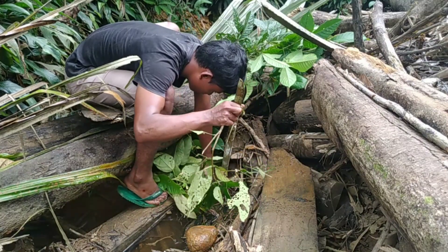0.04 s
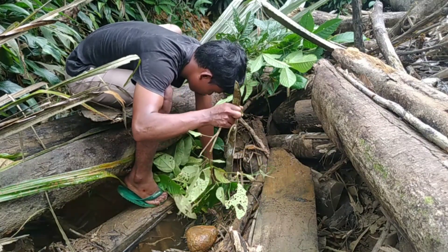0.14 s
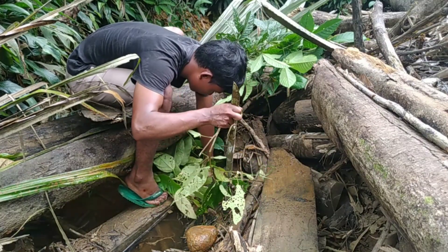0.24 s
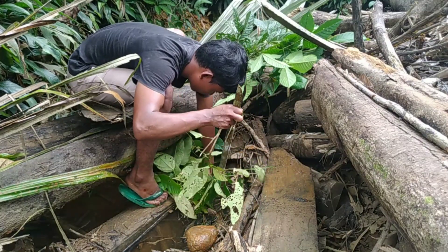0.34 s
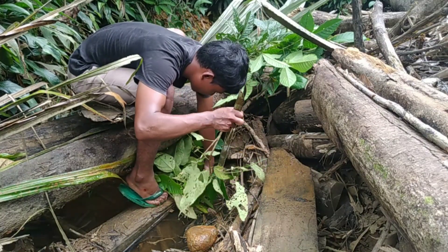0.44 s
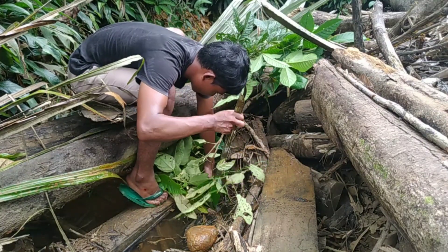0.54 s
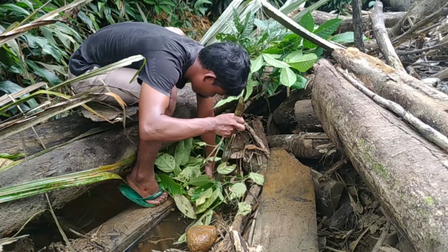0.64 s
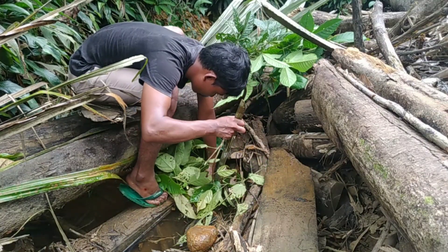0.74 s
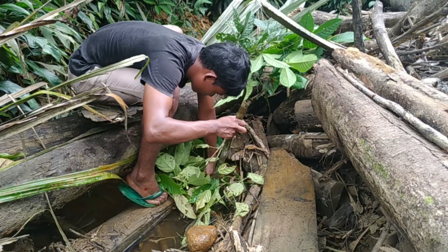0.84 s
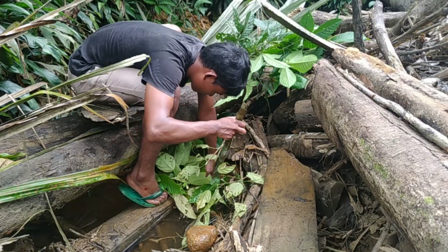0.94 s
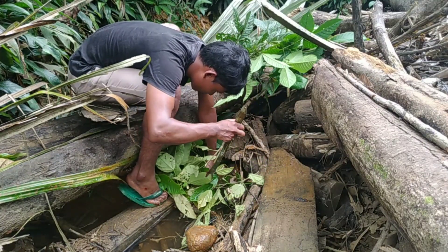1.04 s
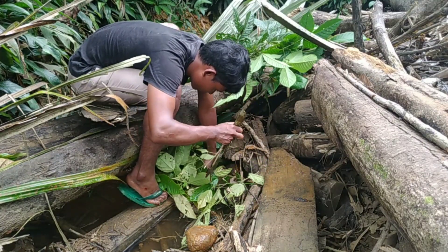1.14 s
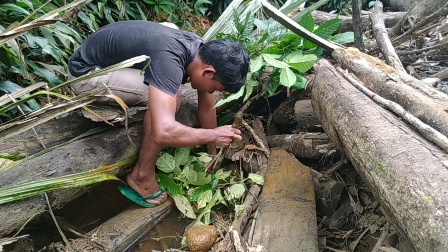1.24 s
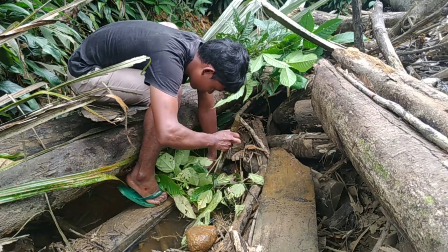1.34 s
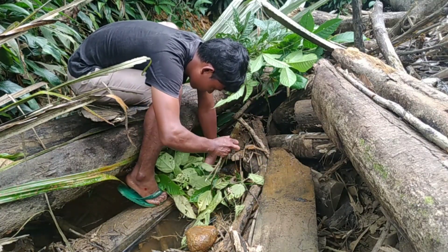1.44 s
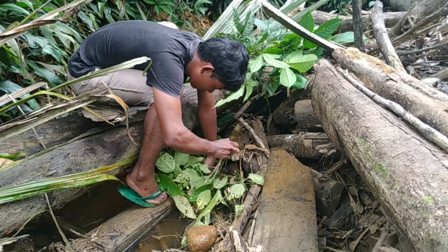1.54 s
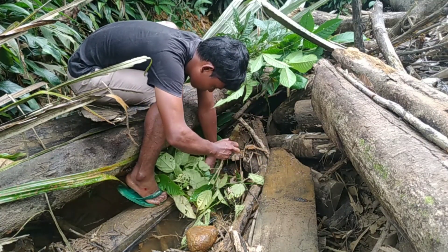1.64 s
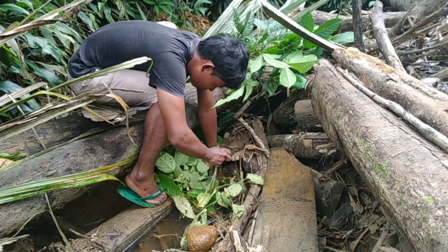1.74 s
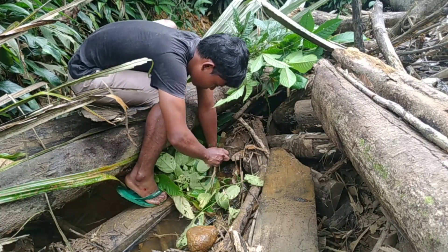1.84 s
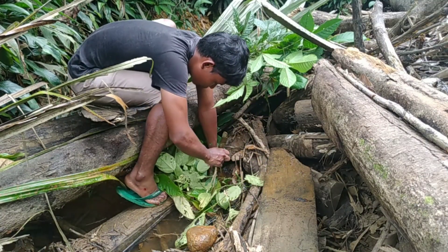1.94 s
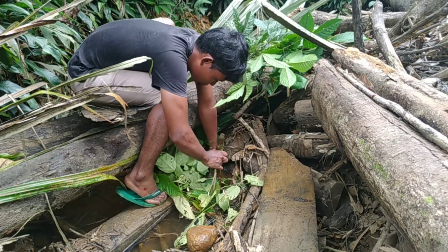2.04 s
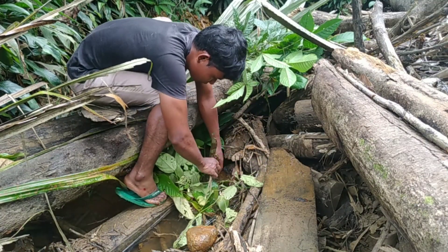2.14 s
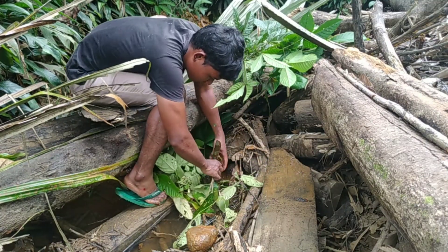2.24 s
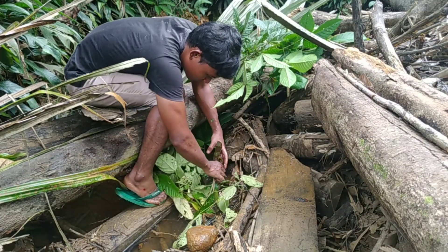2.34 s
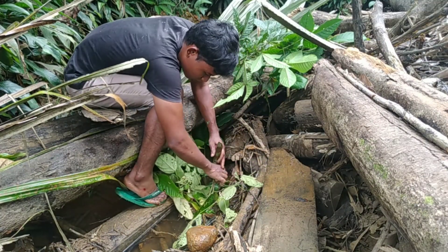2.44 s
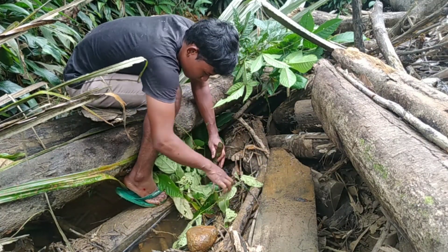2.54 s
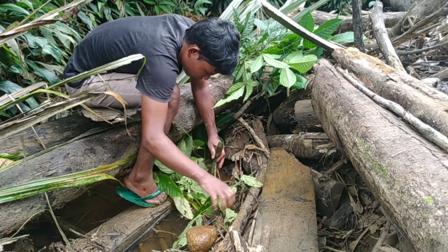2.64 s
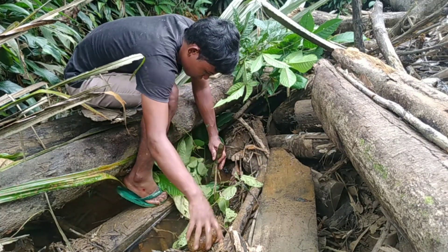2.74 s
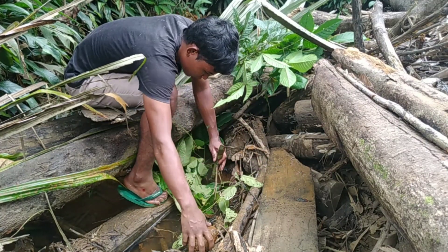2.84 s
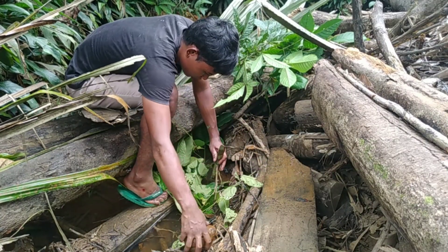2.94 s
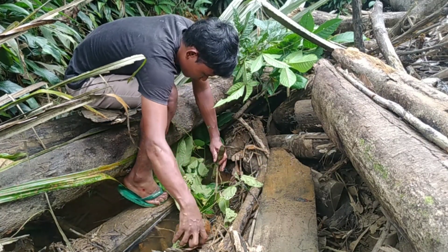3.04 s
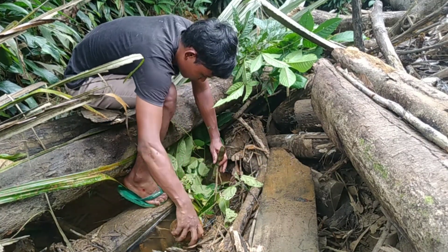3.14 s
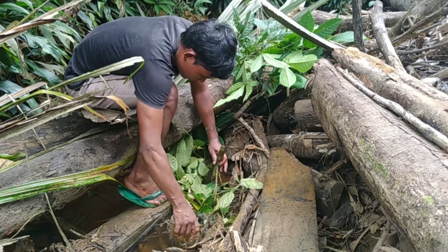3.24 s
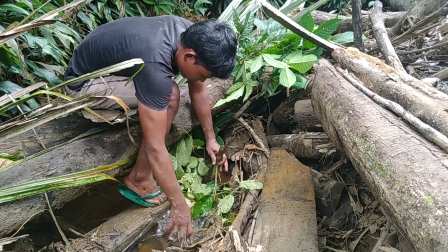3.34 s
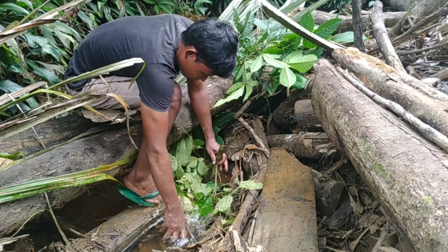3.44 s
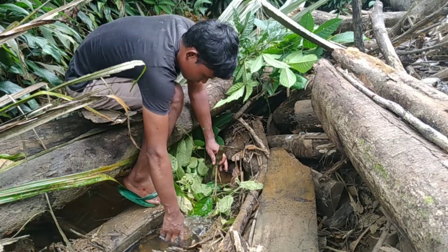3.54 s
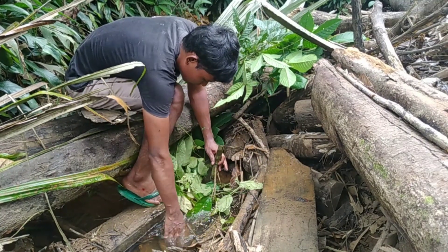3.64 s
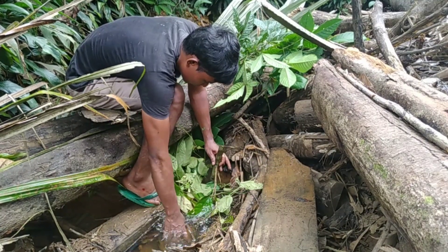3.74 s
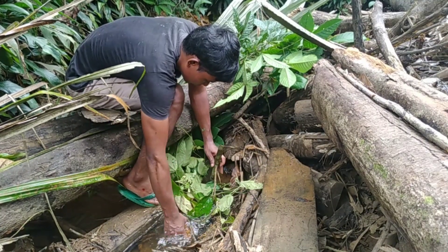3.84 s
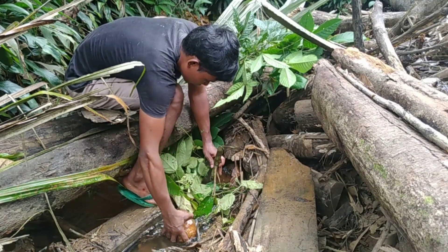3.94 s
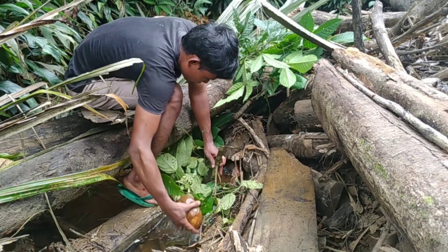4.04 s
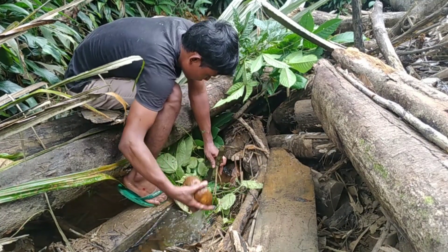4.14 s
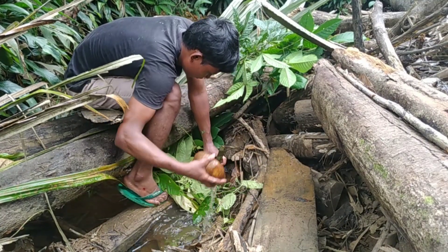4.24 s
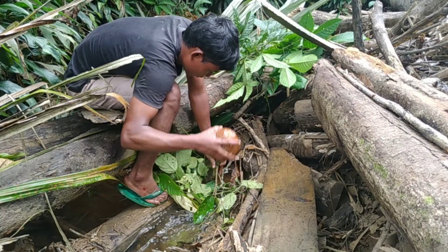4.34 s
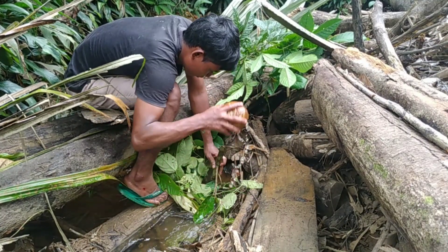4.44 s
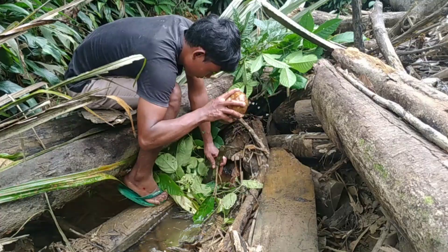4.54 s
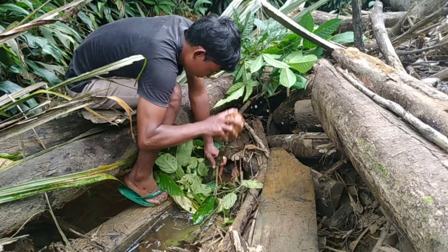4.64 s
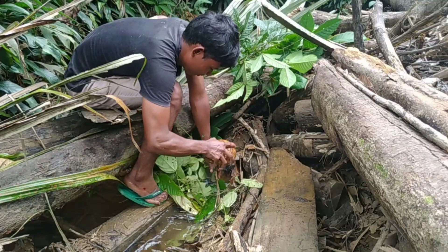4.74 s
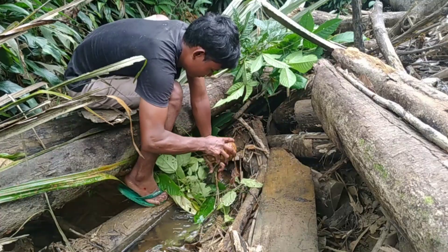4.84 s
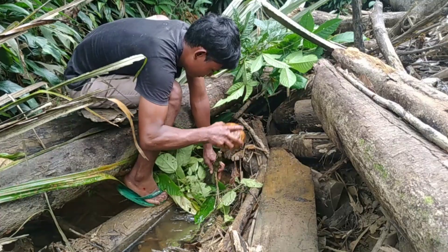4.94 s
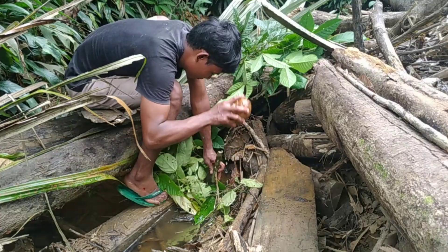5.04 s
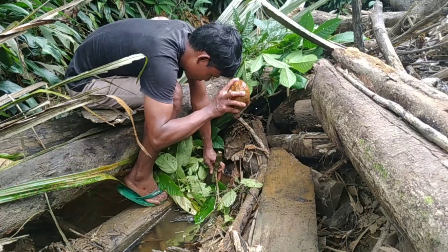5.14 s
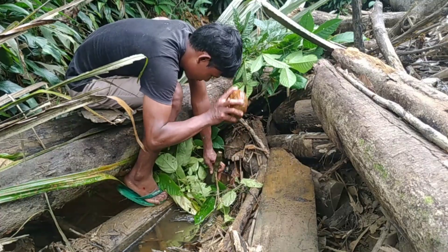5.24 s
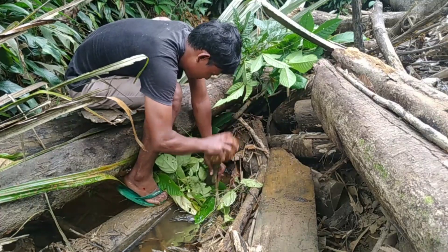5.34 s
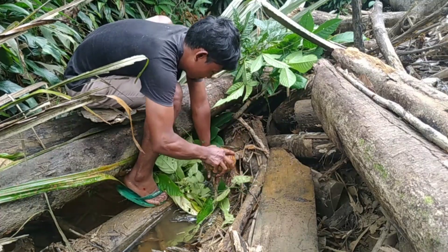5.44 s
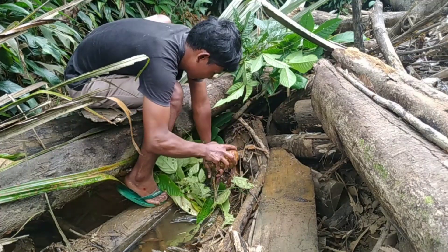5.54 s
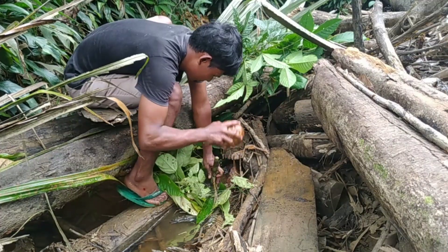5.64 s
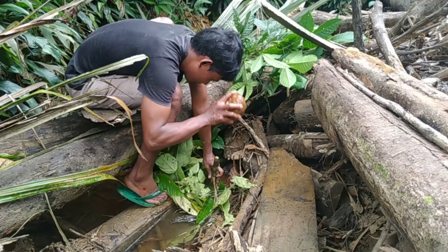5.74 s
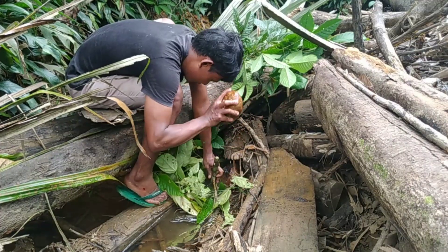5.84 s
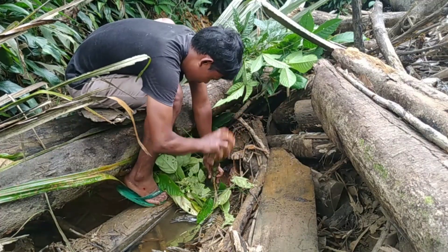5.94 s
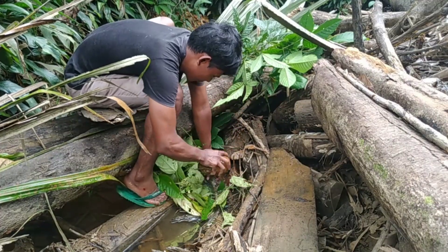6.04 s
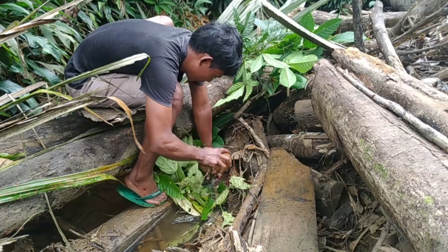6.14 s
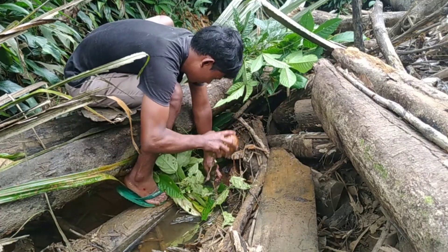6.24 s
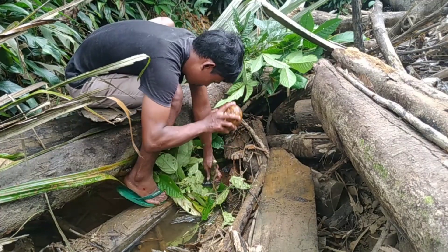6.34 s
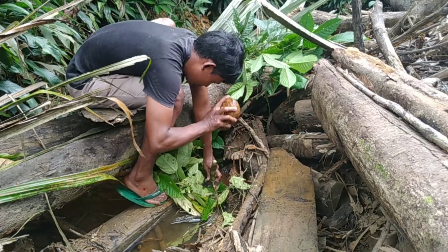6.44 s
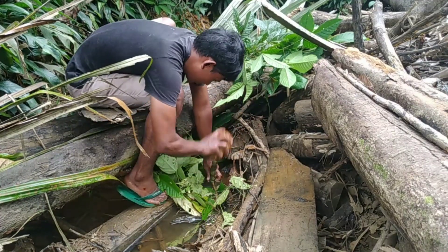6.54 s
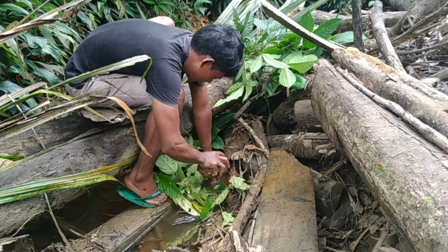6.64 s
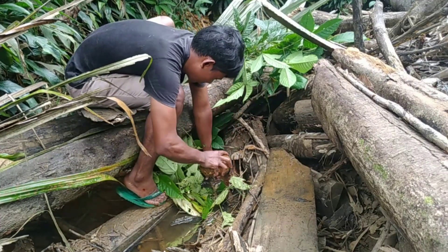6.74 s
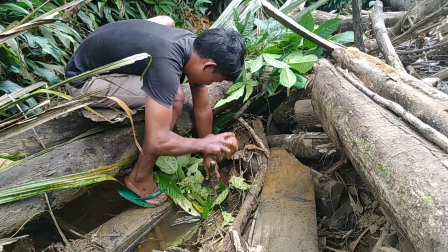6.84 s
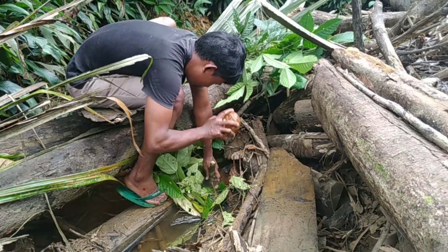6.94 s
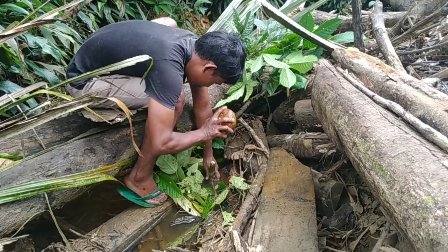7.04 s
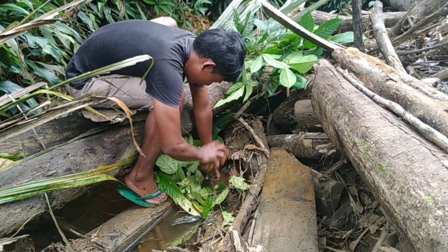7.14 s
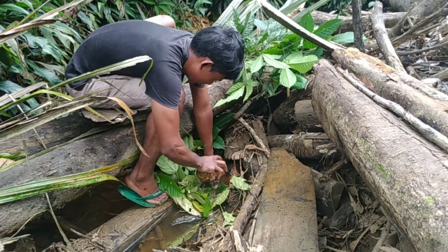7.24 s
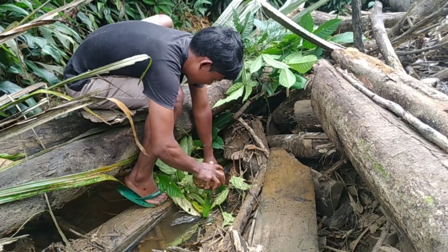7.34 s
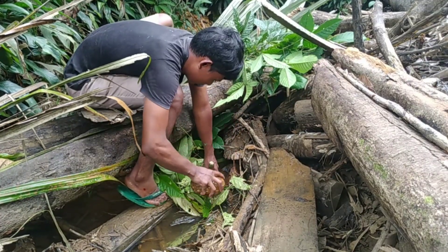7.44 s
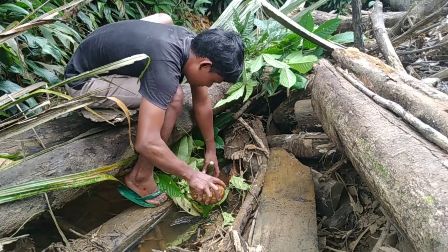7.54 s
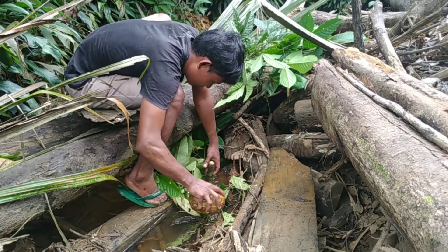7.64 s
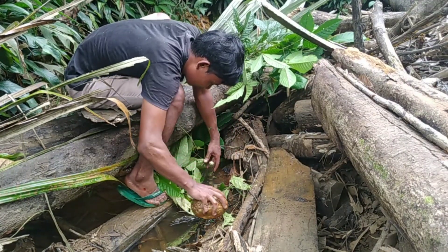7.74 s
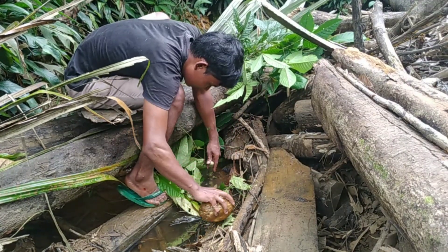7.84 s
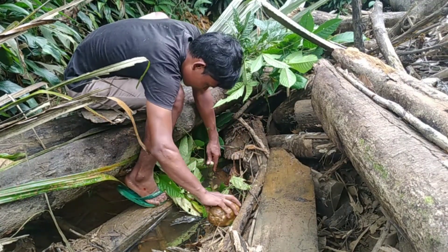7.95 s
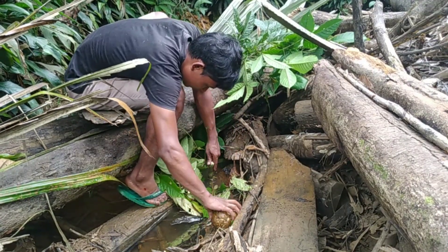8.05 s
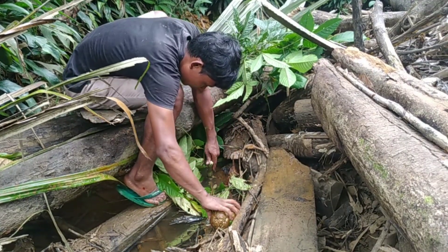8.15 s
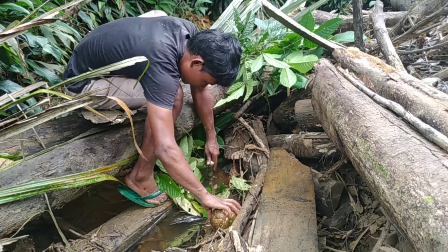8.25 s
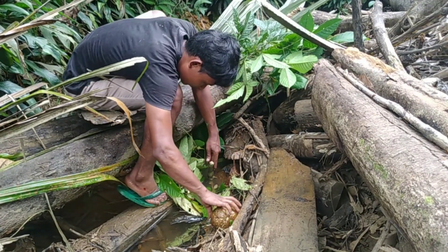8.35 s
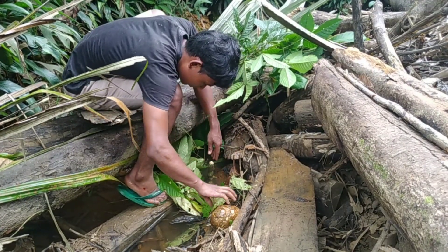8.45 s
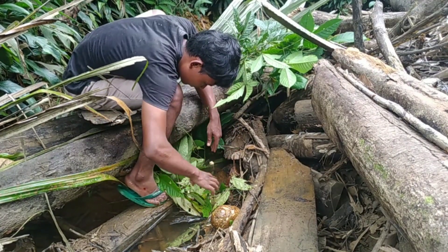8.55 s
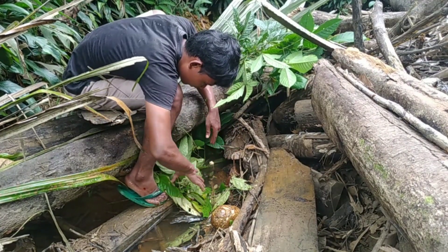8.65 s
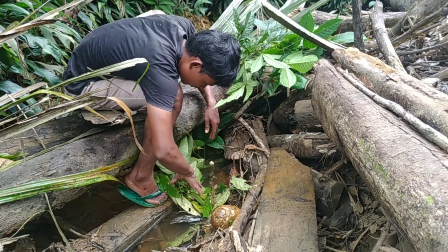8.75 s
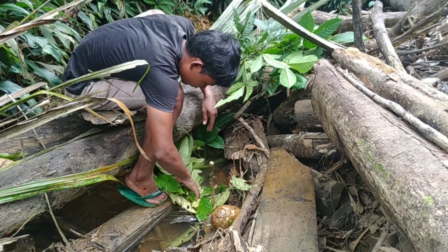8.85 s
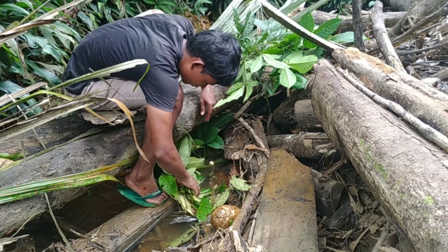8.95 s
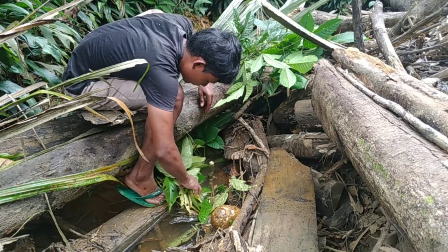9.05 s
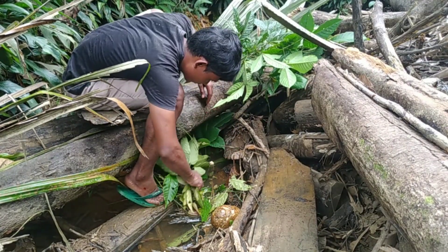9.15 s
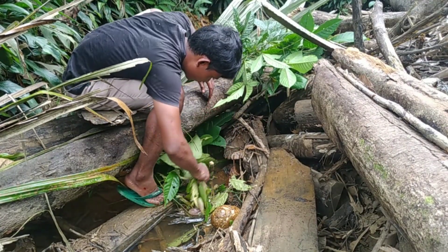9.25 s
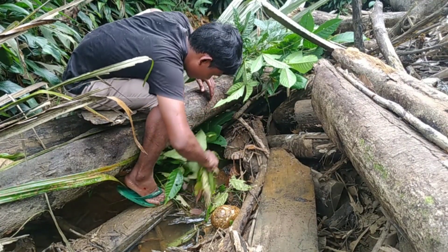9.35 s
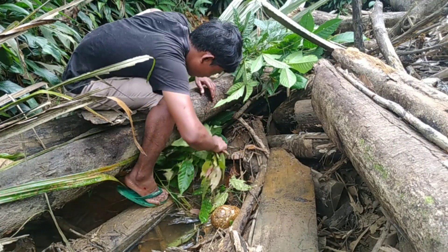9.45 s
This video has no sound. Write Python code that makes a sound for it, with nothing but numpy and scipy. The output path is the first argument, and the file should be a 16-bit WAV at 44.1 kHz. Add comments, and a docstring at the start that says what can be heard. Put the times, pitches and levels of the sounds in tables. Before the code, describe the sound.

Throughout, a dense high insect drone with thin, raspy gliding whistles sits brightest on the right, over quiet forest air and low air rumble, which puffs up around 0.7, 2 and 9.4 s. From 0 to 3 s, leaves brush softly in fine crackles, with small twig snaps at 0.7, 1.6 and 1.8 s. At 3.3 to 3.5 s come two muffled nudges, a sharp crack and a hand plunging into shallow water, with crackling spray and rising bubble gulps. Drips and smaller splashes continue to 4.4 s. Five heavy stone blows on a stake land at 4.8, 5.45, 6.07, 6.7 and 7.3 s: low thuds with woody knocks and wet fibre crunch, the later ones harder and brighter. A faint hum swells in near 6 s. At 8.1 s the stone is laid down lightly. From 8.9 s leaves rustle more strongly, with stems snapping. Close microphone, short echoes from logs.

```python
"""A stone pounds a stake into soft wet ground: five heavy blows after two nudges, each ringing the stake's modes
over crushed-fibre noise; then the stone is laid down. Before that a hand sweeps through a shallow stream, in
crackling spray and rising bubble tones. Leaves rustle as runs of tiny crackles, and stems and twigs snap.
Around lie an insect drone of coloured noise, gliding whistles, a faint hum, air rumble and forest air,
with the insects brightest on the right."""
import sys
import numpy as np
from scipy import signal
from scipy.fft import rfft, irfft
from scipy.io import wavfile

SR = 44100
rng = np.random.default_rng(int(sys.argv[2]) if len(sys.argv) > 2 else 0)


def to_wav(sig):
    """Store sig (one row per channel, or 1-D mono) as 16-bit WAV at the path in sys.argv[1].

    Samples outside -1..1 are clipped; the rate is SR.
    """
    pcm = np.clip(np.atleast_2d(sig), -1, 1) * 32767
    pcm = np.round(pcm).astype(np.int16)
    wavfile.write(sys.argv[1], SR, pcm.T)  # frames by channels


N = 419391
TIME = np.arange(N) / SR  # s
BINS = np.maximum(np.fft.rfftfreq(N, 1 / SR), 1)  # Hz, kept above zero for the logarithm


def from_db(db):
    """Turn decibels into gain."""
    return 10 ** (np.asarray(db) / 20)


def rms_one(x):
    """Scale to unit power."""
    return x / np.sqrt(np.mean(x ** 2) + 1e-20)


def per_bin(points):
    """Draw a (frequency_hz, value) curve over the spectrum, straight on a log-frequency axis."""
    hz, value = np.transpose(points)
    return np.interp(np.log(BINS), np.log(hz), value)


def drift(rate_hz, t=TIME, size=8192):
    """Wander smoothly between random points, with spread 1."""
    points = rng.standard_normal(size)
    return np.interp(t * rate_hz, np.arange(size), points) * np.sqrt(1.5)  # joining lines narrow the spread


def stereo(gain, mid, side, alike):
    """Colour mid and side noise spectra and blend them to a left-right correlation; rms 1."""
    alike = np.clip(alike, -1, 1)
    spread = np.sqrt(1 + alike) * mid + np.sqrt(1 - alike) * side * [[1], [-1]]
    return rms_one(irfft(gain * spread, N))


def pair(gain, alike, size=1):
    """Stereo noise of a given colour, left-right correlation and grain size."""
    mid, side = rfft(rng.standard_normal((2, N)) * size)
    return stereo(gain, mid, side, alike)


# how alike left and right are: (frequency_hz, correlation)
LIKENESS = [(30, 0.54), (250, 0.99), (600, 0.98), (1200, 0.73), (2500, 0), (5000, 0.86), (15000, 0)]


def grains(spectrum, per_s, spread_db, wash):
    """Tiny clicks of uneven size over a wash of finer ones."""
    born = rng.random(N) < per_s / SR
    size = born * from_db(spread_db * np.minimum(rng.exponential(1, N), 4)) + wash
    return pair(from_db(per_bin(spectrum)), per_bin(LIKENESS), size)


def crackles(spectrum, per_s, spread_db, wash, clump_db, count=12):
    """Tiny fractures, each sounding in a pitch range of its own and coming in clumps; rms 1."""
    place = np.interp(np.log(BINS), np.log([300, 12000]), [0, count - 1])
    sound = 0
    for k in range(count):
        born = rng.random(N) < per_s / SR
        size = born * from_db(spread_db * np.minimum(rng.exponential(1, N), 3))
        clumps = from_db(clump_db * drift(70))
        clicks = rng.standard_normal((2, N)) * (size + wash) * clumps
        pitch_range = np.sqrt(np.maximum(1 - abs(place - k), 0))
        sound = sound + rfft(clicks) * pitch_range
    mid, side = sound
    return stereo(from_db(per_bin(spectrum)), mid, side, per_bin(LIKENESS))


def add(out, s, sound):
    """Mix a short sound in at a time."""
    at = round(s * SR)
    out[at:at + len(sound)] += sound[:N - at]


def bursts(rows, rise_s):
    """Envelope of (start_s, level_db, t60_s) bursts that rise fast and die away."""
    out, age = np.zeros(N), TIME[:SR // 2]
    for s, db, t60 in rows:
        add(out, s, from_db(db - 60 * age / t60) * (1 - np.exp(-age / rise_s)))
    return out


def strokes(rows, rise_s, t60_s):
    """Envelope of (start_s, hold_s, level_db) hand movements: each swells, holds and dies away."""
    power = np.zeros(N)
    for s, hold_s, db in rows:
        swell = np.exp(np.clip((TIME - s) / rise_s, -20, 0))
        fall_db = 60 * np.clip((TIME - s - hold_s) / t60_s, 0, 2)
        power += (swell * from_db(db - fall_db)) ** 2
    return np.sqrt(power)


def clearing(x, near_db, far_db, near_t60_s=0.092, far_t60_s=0.28, dull_hz=3500):
    """Close logs scatter the sound at once; the trees return a faint, dull tail."""
    age = TIME[:SR]
    near, far = rng.standard_normal((2, 2, SR)) * (age > .003)
    far = signal.sosfilt(signal.butter(1, dull_hz, fs=SR, output="sos"), far)
    near = from_db(near_db) * rms_one(near * from_db(-60 * age / near_t60_s))
    far = from_db(far_db) * rms_one(far * from_db(-60 * age / far_t60_s))
    thin = signal.butter(2, 600, "high", fs=SR, output="sos")
    echo = signal.sosfilt(thin, (near + far) / np.sqrt(SR))
    return x + signal.oaconvolve(x, echo, axes=1)[:, :N]


# colour of the forest air: (frequency_hz, density_db per Hz)
FOREST = [(60, 6.5), (150, 7.5), (300, 5), (500, 0.5), (800, -3.5), (1500, -10), (2600, -4), (4000, -21),
          (6000, -12.5), (15000, -18)]


def forest_air(level_db=-55.0):
    """Steady noise of the forest, heaviest in the lows."""
    return from_db(level_db) * pair(from_db(per_bin(FOREST)), 0.5 * per_bin(LIKENESS))


# colour of the air rumble: (frequency_hz, density_db per Hz)
RUMBLE = [(10, 2.5), (25, 2), (60, -1), (90, -8.5), (130, -16.5), (220, -44), (500, -36.5)]
# puffs of air on the microphone: (centre_s, half_width_s, level_db above the calm)
PUFFS = [(0.68, 0.5, 9), (2.0, 0.51, 6), (7.45, 0.19, 4.5), (8.2, 0.26, 4.5), (9.42, 0.31, 11.5)]


def breeze(calm_db=-47.0, flutter_db=2):
    """Air rumbles on the microphone and swells with each puff."""
    puff_db = sum(db * np.exp(-((TIME - s) / width) ** 2) for s, width, db in PUFFS)
    level_db = calm_db + puff_db + flutter_db * drift(7)
    return from_db(level_db) * pair(from_db(per_bin(RUMBLE)), 0.9)


def hum(pitch_hz=480, waver_hz=9, start_s=5.8, swell_s=1.1, hum_db=-65):
    """A faint sine with a wavering pitch swells in and stays."""
    swell = np.clip((TIME - start_s) / swell_s, 0, 1)
    hz = pitch_hz + waver_hz * drift(40)
    return from_db(hum_db) * swell * np.sin(2 * np.pi * np.cumsum(hz) / SR)


# colour of the insect chorus: (frequency_hz, density_db per Hz)
CHORUS = [(4500, -25), (5500, -18.5), (6400, -7), (7300, -2), (8000, -8), (8550, -7.5), (8850, -1),
          (9700, 3), (10400, 0.5), (11000, -7.5), (11700, -8.5), (12500, -10.5), (13300, -13),
          (15300, -22.5)]


def chorus(chorus_db=-33.5, trill_hz=3110, trill_width_hz=135, trill_db=-58.5, throb_db=2):
    """Countless far insects, each on a narrow pitch of its own, and the merged fundamentals of far whistlers."""
    # uneven strength every 15 Hz breaks the noise into narrow voices
    voices_db = 2.4 * np.interp(BINS / 15, np.arange(4096), rng.standard_normal(4096))
    drone = from_db(chorus_db) * pair(from_db(per_bin(CHORUS) + voices_db), 0)
    band = np.exp(-.5 * ((BINS - trill_hz) / trill_width_hz) ** 2)
    trill = pair(from_db(voices_db) * band, 0.33)
    return drone + from_db(trill_db + throb_db * drift(9)) * trill


# whistling insects, one phrase each, level relative to the whistle and fundamental settings:
# (start_s, end_s, first_hz, middle_hz, last_hz, level_db)
WHISTLES = [(-.2, 2.85, 12150, 12225, 12385, 1.5), (-.2, 2.8, 12790, 12600, 12385, -5),
            (-.2, 2.1, 12250, 12375, 12450, -5), (-.1, 1.0, 12170, 12260, 12330, -6),
            (0, 2.9, 12500, 12590, 12730, -9), (.3, 1.8, 12900, 12760, 12695, -4.5),
            (2.25, 3.5, 12160, 12285, 12440, -6), (3.4, 4.9, 12480, 12690, 12940, -9),
            (3.45, 5.65, 12060, 12320, 12510, 1), (3.5, 4.5, 12150, 12210, 12260, -5),
            (3.7, 5.6, 12500, 12690, 12860, -9), (4.1, 6.05, 12060, 12180, 12260, -3),
            (5.3, 6.3, 12140, 12180, 12220, -7), (6.2, 8.1, 12270, 12600, 12860, -8),
            (6.45, 8.15, 12115, 12205, 12280, -3), (6.5, 8.3, 12110, 12360, 12530, 1),
            (6.8, 9.7, 12880, 12680, 12450, -7), (8.05, 9.7, 12070, 12165, 12240, -3),
            (9.1, 9.8, 12040, 12150, 12240, -1)]


def whistlers(whistle_db=-38.0, fundamental_db=-59.0):
    """Thin, raspy insect glides: a strong fourth harmonic over a faint fundamental, pulsing slightly."""
    waver_hz, flutter_db, rasp, fade_s = 7, 3.3, .26, .15
    pulse_hz, pulse_depth = 390, .14
    out = np.zeros((2, N))
    for start, end, first_hz, middle_hz, last_hz, db in WHISTLES:
        on = (TIME > start) & (TIME < end)
        t = TIME[on]
        glide = np.polyfit([start, (start + end) / 2, end], [first_hz, middle_hz, last_hz], deg=2)
        hz = np.polyval(glide, t) + waver_hz * drift(60, t)
        fade = np.clip(np.minimum(t - start, end - t) / fade_s, 0, 1)
        gain = fade * from_db(db + flutter_db * drift(14, t))
        # each ear gets a phase of its own
        phase = 2 * np.pi * (np.cumsum(hz) / SR + rng.random((2, 1)))
        scrape = 1 + rasp * drift(300, t) + pulse_depth * np.sin(2 * np.pi * pulse_hz * t)
        whistle = scrape * np.sin(phase)
        fundamental = from_db(flutter_db * drift(5, t)) * np.sin(phase / 4)
        out[:, on] += gain * (from_db(whistle_db) * whistle + from_db(fundamental_db) * fundamental)
    return out


# colour of rubbing leaves: (frequency_hz, density_db per Hz)
LEAVES = [(100, -1), (300, 8), (700, 5), (1500, 4), (2400, 6.5), (3600, 2.5), (5500, 2), (8200, -12),
          (10000, 2), (11500, 7), (13200, -2), (15500, -18)]
# a hand brushes the leaves, level before the rustle setting: (start_s, hold_s, level_db)
BRUSHES = [(0.15, 0.35, -57.5), (0.715, 0.022, -49), (1.52, 0.016, -48.5), (1.65, 0.21, -53.5),
           (1.84, 0.074, -51), (2.2, 0.048, -47), (2.36, 0.099, -64), (2.92, 0.51, -53.5),
           (8.905, 0.068, -43.5), (9.02, 0.55, -46), (9.17, 0.015, -44), (9.28, .1, -52), (9.44, 0.07, -48)]


def leaves(rustle_db=4):
    """Leaves and stems rub in a dense run of fine crackles while the hands move."""
    motion = strokes(BRUSHES, rise_s=0.056, t60_s=0.51) * from_db(.8 * drift(60))
    crackle = crackles(LEAVES, per_s=380, spread_db=3.3, wash=.1, clump_db=1.2)
    return motion * from_db(rustle_db) * crackle


# sharp spatters and twig snaps: (start_s, bright_db, body_db, t60_s)
SNAPS = [(0.41, -35, -41.5, 0.15), (0.706, -31, -38, 0.24), (1.592, -30, -41.5, 0.047),
         (1.819, -23, -37, 0.076), (2.632, -33, -41.5, 0.15), (3.0163, -25, -59, 0.3),
         (3.046, -29, -50, 0.33), (3.261, -24, -34.5, 0.35), (3.3831, -4, -33, 0.017),
         (3.386, -21, -29, 0.074), (3.438, -8.5, -27, 0.048), (3.685, -21, -59, 0.13),
         (3.9857, -17.5, -33.5, 0.063), (4.164, -15, -29, 0.038), (4.272, -24, -40, 0.044),
         (4.379, -25.5, -42, 0.089), (4.439, -22, -60, 0.097), (6.1772, -33, -29.5, 0.07),
         (8.9, -27, -28.5, 0.036), (8.948, -29, -36, .04), (9.049, -28, -35.5, 0.044),
         (9.172, -23.5, -42, 0.055), (9.221, -25, -35, 0.044), (9.257, -32, -41, 0.027),
         (9.408, -25.5, -42, 0.37), (9.468, -31, -33, .04)]
# colour of grit and of bright edges: (frequency_hz, density_db per Hz)
GRIT = [(2000, -19.5), (6000, -4.5), (8200, -5), (9500, 5), (11200, 11), (12500, 1), (13600, -2),
        (15500, -13)]
# colour of a crack's body: (frequency_hz, density_db per Hz)
CRACK = [(150, -4), (700, -2.5), (1700, 6), (2600, 5), (4000, 1.5), (8000, -12), (15000, -49)]


def snaps():
    """Short noise cracks with a bright edge and a woody body."""
    edge = bursts([(s, db, t60) for s, db, _, t60 in SNAPS], rise_s=0.0006)
    body = bursts([(s, db, t60) for s, _, db, t60 in SNAPS], rise_s=0.00013)
    bright = edge * pair(from_db(per_bin(GRIT)), 0.11)
    woody = body * pair(from_db(per_bin(CRACK)), per_bin(LIKENESS))
    return bright + woody


def bubble(hz, cycles, rise):
    """A trapped air pocket rings and climbs in pitch as it nears the surface."""
    age = TIME[:SR // 12]
    life = age * hz / cycles  # 1 when it has rung down by 60 dB
    phase = 2 * np.pi * hz * age * (1 + rise * np.minimum(life, 2))
    return from_db(-60 * life) * (1 - np.exp(-age * hz)) * np.sin(phase)


# the clearest drips: (start_s, level_db, pitch_hz)
DRIPS = [(3.435, -20, 890), (3.444, -10, 764), (3.447, -10, 1450), (3.4645, -9, 2310), (3.47, -17, 1090),
         (3.48, -17, 2550), (3.488, -10, 2510), (3.513, -27, 1097), (3.524, -34, 850), (3.545, -27, 690),
         (3.615, -30, 824), (3.637, -25.5, 1440), (3.641, -22, 1870), (3.691, -30.5, 1080),
         (3.745, -33, 1260), (3.803, -33, 1350), (3.86, -39, 1200), (3.987, -23.5, 1800), (4.095, -37, 870),
         (4.129, -23, 2196), (4.145, -29, 1280), (4.16, -19, 1380), (4.192, -20, 1210), (4.194, -18, 1720),
         (4.209, -24, 1345), (4.274, -15, 4830), (4.285, -24, 1650), (4.287, -29, 1200), (4.302, -29, 1800),
         (4.376, -28, 1933), (4.382, -31, 1020), (5.068, -28.5, 1550), (5.425, -28, 1680),
         (5.574, -24, 1560), (6.178, -21.5, 1530)]
# water runs off the hand and the stone as fainter drips:
# (start_s, length_s, first_db, last_db, middle_hz)
TRICKLES = [(3.504, .06, -30, -34, 777), (3.579, .18, -50, -42, 1510), (3.76, 0.32, -45, -44.5, 1338),
            (4.104, 0.087, -31.5, -39, 1540), (4.224, .17, -37, -45, 1530), (4.868, .035, -29, -26, 1680),
            (5.52, 0.1, -35, -36, 1610)]


def plunge(start_s=3.419, gap_s=0.0075, pitch_hz=432, step_octaves=0.328, level_db=-18.5, step_db=1.5, count=5):
    """The hollow behind the plunging hand closes as a run of ever smaller, louder bubbles."""
    return [(start_s + k * gap_s, level_db + k * step_db, pitch_hz * 2 ** (k * step_octaves))
            for k in range(count)]


def trickles(per_s=120, spread_octaves=0.844, uneven_db=4):
    """Runs of drips, scattered in time, level and pitch."""
    rows = []
    for start, length, first_db, last_db, middle_hz in TRICKLES:
        n = max(round(length * per_s), 1)
        for k, (late, size, pitch) in enumerate(rng.uniform(-1, 1, (n, 3))):
            along = (k + .5 + .5 * late) / n
            db = first_db + along * (last_db - first_db) + uneven_db * size
            rows.append((start + along * length, db, middle_hz * 2 ** (spread_octaves * pitch)))
    return rows


def drops(drip_cycles=23, glide=0.2):
    """The plunge gulps, single drips fall, and trickles patter after the hand, all as bubbles."""
    out = np.zeros(N)
    for s, db, hz in plunge() + trickles() + list(DRIPS):
        ring, climb = rng.uniform(.6, 1.4, 2)
        add(out, s, from_db(db) * bubble(hz, cycles=drip_cycles * ring, rise=glide * climb))
    return out


# colour of the spray: (frequency_hz, density_db per Hz)
SPRAY = [(80, -3), (250, -8.5), (600, -12), (1400, -10), (2400, 1.5), (3500, -5.5), (5000, -5),
         (8000, -4.5), (10300, 4), (11800, 1), (13500, -4), (15500, -15)]
# the hand sweeps through the water, level before the spray and fizz settings: (start_s, hold_s, level_db)
SWEEPS = [(3.286, 0.072, -30.5), (3.383, 0.091, -28), (3.44, 0.012, -27), (3.461, 0.029, -19),
          (3.52, 0.025, -39.5), (3.57, 0.173, -43.5), (4.14, 0.071, -36), (4.273, 0.22, -49.5)]


def water(count=700, spray_db=-1):
    """The hand throws up spray and a swarm of small bubbles; larger ones and drips sound singly."""
    rise_s, t60_s = .018, .11
    fizz_db, size_range_db, lowest_hz, octaves = -3, 23, 750, 2.5
    first = SWEEPS[0][0] - rise_s
    last = SWEEPS[-1][0] + SWEEPS[-1][1] + t60_s
    stir = strokes(SWEEPS, rise_s, t60_s) * from_db(1.8 * drift(130))
    rings = drops()
    for when, pitch, faintness in rng.random((count, 3)):
        s = first + when * (last - first)
        gain = stir[round(s * SR)] * from_db(fizz_db + size_range_db * (.5 - faintness))
        hz = lowest_hz * 2 ** (octaves * pitch ** .7)
        add(rings, s, gain * bubble(hz, cycles=20, rise=0.22))
    spray = crackles(SPRAY, per_s=220, spread_db=3.2, wash=.03, clump_db=3)
    return from_db(spray_db) * stir * spray, rings


# modes of the stake in soft ground, nominal before each blow's variation: (pitch_hz, level_db, t60_s)
STAKE = [(85, -55, 0.19), (108.5, -27.5, 0.21), (142, -24.5, 0.082), (205, -21, 0.063), (346, -20.5, 0.034),
         (393, -17.5, 0.03), (490, -14, 0.025), (593, -22.5, 0.028), (750, -19, 0.03), (1020, -19.5, 0.018),
         (1170, -21, 0.01), (1340, -23.5, 0.015)]


def knock(contact_hz, bend_hz=520, lowest_hz=75, hollow_hz=268, hollow_q=8):
    """One push rings the stake's modes, softened by the contact; bending waves bring the treble first."""
    age = TIME[:SR // 3]
    hz, mode_db, t60 = np.transpose(STAKE)[:, :, None]
    # the stake sits differently after each blow
    strength, detune = rng.uniform(-1, 1, (2, len(STAKE), 1))
    ring_db = mode_db + 2.5 * strength - 60 * age / t60
    modes = from_db(ring_db) * np.sin(2 * np.pi * hz * (1 + 0.04 * detune) * age)
    contact = signal.butter(1, [lowest_hz, contact_hz], "band", fs=SR, output="sos")
    push = signal.sosfilt(contact, modes.sum(axis=0))
    # a hollow between thud and knock
    push = signal.lfilter(*signal.iirnotch(hollow_hz, hollow_q, fs=SR), push)
    # an all-pass delays the lows
    _, poles = signal.butter(2, bend_hz, fs=SR)
    return -signal.lfilter(poles[::-1], poles, push)


# short woody clacks, as each blow lands on another spot and as a stem breaks:
# (start_s, level_db, pitch_hz, t60_s)
CLACKS = [(4.83, -20, 2510, 0.02), (5.4495, -18, 885, 0.019), (5.451, -21, 1670, 0.026),
          (5.454, -21, 370, 0.015), (5.465, -20, 2040, 0.024), (6.071, -9, 2440, 0.013),
          (6.073, -10, 567, .032), (6.685, -23, 1370, .01), (6.686, -13, 443, .022), (6.178, -34, 900, .03),
          (7.2725, -13, 3100, .012), (7.275, -17.5, 2190, 0.021), (7.281, -16, 616, 0.02),
          (8.901, -13.5, 2250, 0.0069)]


def clacks(rise_s=0.00053):
    """The modes that a contact favours ring briefly under it."""
    return sum(bursts([(s, db, t60)], rise_s) * np.sin(2 * np.pi * hz * (TIME - s))
               for s, db, hz, t60 in CLACKS)


# stone on wood, nudged, then pounding, then laid down:
# (start_s, thud_db, crunch_db, grit_db, contact_cutoff_hz, rebound_after_s, rebound_db relative to the thud)
BLOWS = [(3.263, -19.5, -50, -42, 350, 0.0095, -5.5), (3.387, -12.5, -51, -45, 300, 0.023, -2),
         (4.818, -8, -23, -13, 332, 0.011, 2.5), (4.852, -33, -25.5, -25, 300, 0.012, -11),
         (5.4496, -2.5, -18, -10, 700, 0.022, -3.5), (6.0704, 1, -15.5, -13, 2000, 0.0056, -29),
         (6.6840, 3.5, -20, -14, 2200, 0.0078, -20), (7.2719, 1.5, -19, -13.5, 1500, 0.0078, -9.5),
         (8.111, -22.5, -34, -25.5, 1530, 0.0085, 2.5)]
# colour of crushed wet wood: (frequency_hz, density_db per Hz)
CRUNCH = [(120, 2), (260, 3), (450, -1), (800, -3), (1300, -4), (1900, -1.5), (2500, 0), (3400, -2.5),
          (5000, -7), (8000, -7), (16000, -15)]


def pounding(crunch_t60_s=0.056, grit_t60_s=0.077, settle_db=-24, settle_t60_s=0.54):
    """Each blow and its rebound ring the stake and crush wet fibres; loose debris settles afterwards."""
    thuds = np.zeros(N)
    for s, thud_db, _, _, contact_hz, rebound_s, rebound_db in BLOWS:
        thud = knock(contact_hz)
        add(thuds, s, from_db(thud_db) * thud)
        add(thuds, s + rebound_s, from_db(thud_db + rebound_db) * thud)
    crush = bursts([(row[0], row[2], crunch_t60_s) for row in BLOWS], rise_s=0.00011)
    grit = bursts([(row[0], row[3], grit_t60_s) for row in BLOWS], rise_s=0.0018)
    settle = bursts([(row[0], row[3] + settle_db, settle_t60_s) for row in BLOWS], rise_s=0.0063)
    settle = settle * from_db(1.8 * drift(90))
    fibres = grains(CRUNCH, per_s=3000, spread_db=2.5, wash=.5)
    sand = grains(GRIT, per_s=1000, spread_db=2.2, wash=.35)
    debris = crackles(CRUNCH, per_s=200, spread_db=3, wash=.04, clump_db=3, count=8)
    return thuds + clacks() + crush * fibres + settle * debris + grit * sand


def scene():
    """Work on the stake and in the water close by, insects and forest air behind."""
    background = forest_air() + breeze() + hum() + chorus() + whistlers()
    spray, rings = water()
    drips = clearing(np.array([rings, rings]), near_db=-6, far_db=-15)
    work = clearing(pounding() + spray + leaves(), near_db=-1.5, far_db=-29)
    return background + snaps() + drips + work


# the left port is shaded from the treble: (frequency_hz, gain_db)
LEFT_SHADE = [(100, -0.5), (1200, -0.5), (2400, -0.5), (4500, 1), (5600, 0), (6500, -7.5), (8400, -7.5),
              (9400, -14.5), (11200, -26), (12300, -14), (13400, -17), (15000, -3)]


def record(dry):
    """The left port hears later and duller; peaks are clipped and the top is cut."""
    lag_s, cutoff_hz = 4 / SR, 15600
    delay = np.exp(-2j * np.pi * BINS * lag_s)
    left = irfft(rfft(dry[0]) * from_db(per_bin(LEFT_SHADE)) * delay, N)
    top = signal.ellip(10, .1, 70, cutoff_hz, fs=SR, output="sos")
    return signal.sosfilt(top, np.clip([left, dry[1]], -1, 1))


dry = scene()
out = record(dry)
to_wav(out)
```